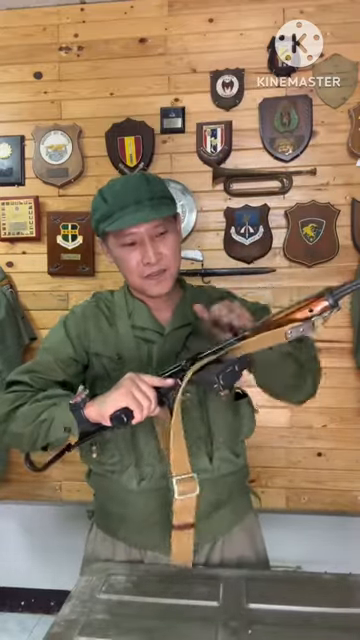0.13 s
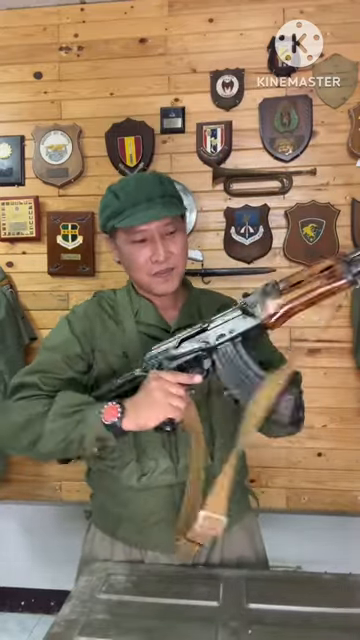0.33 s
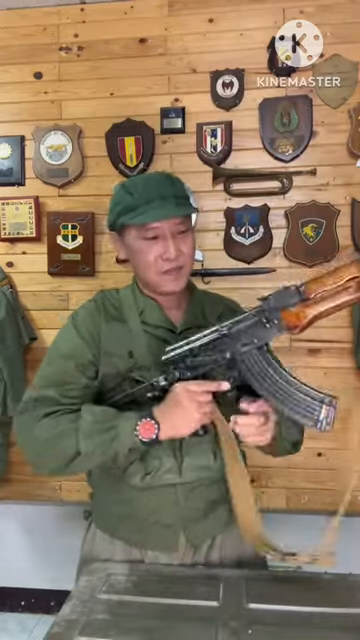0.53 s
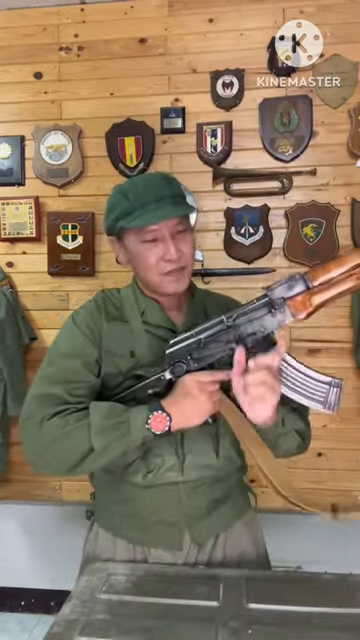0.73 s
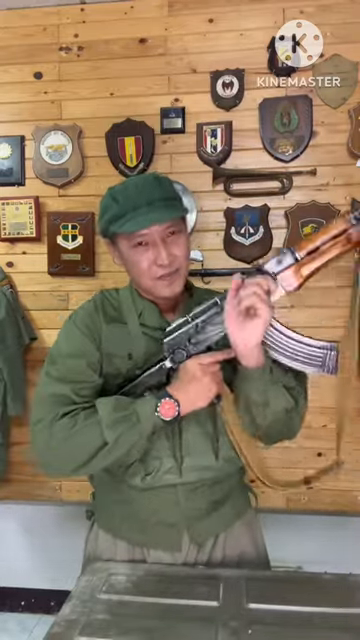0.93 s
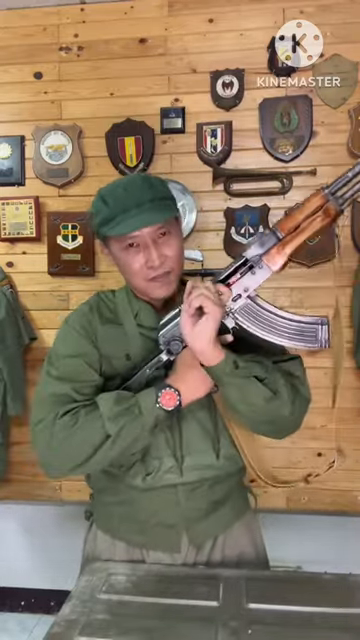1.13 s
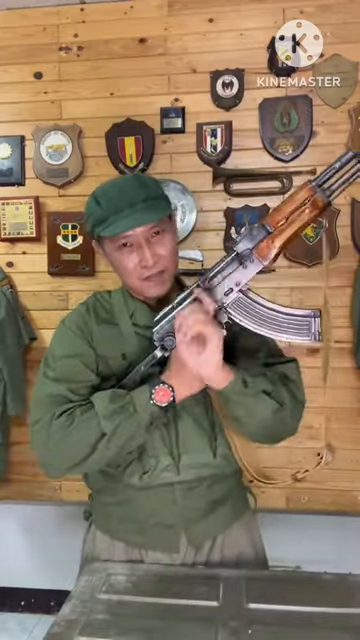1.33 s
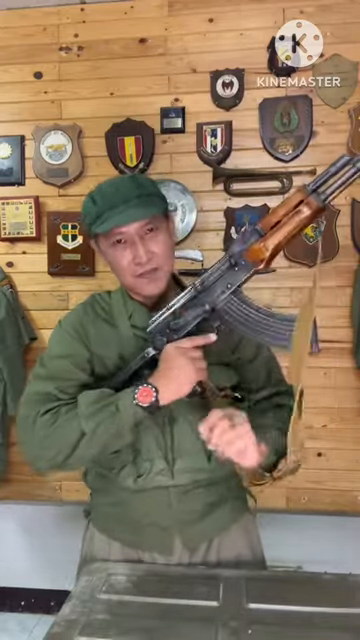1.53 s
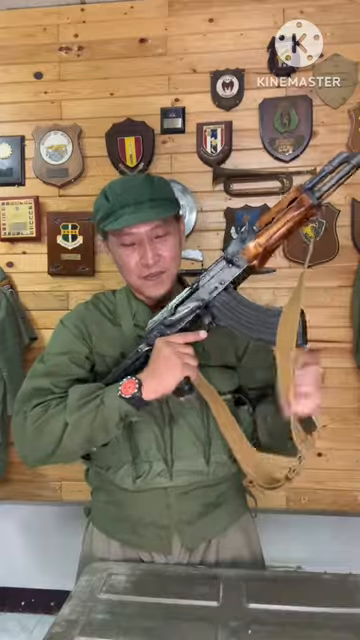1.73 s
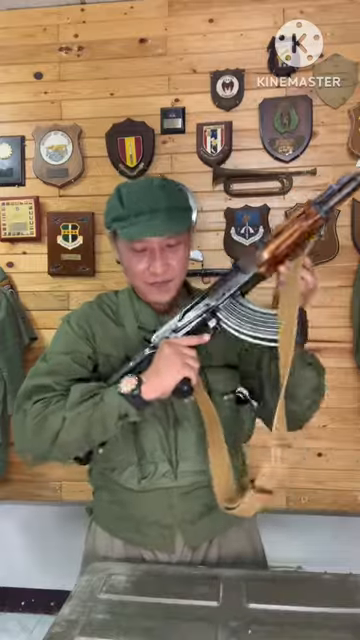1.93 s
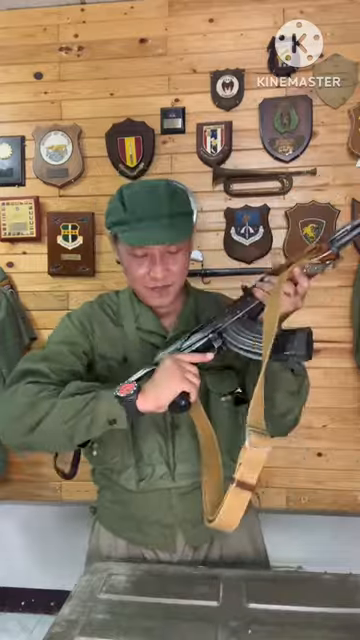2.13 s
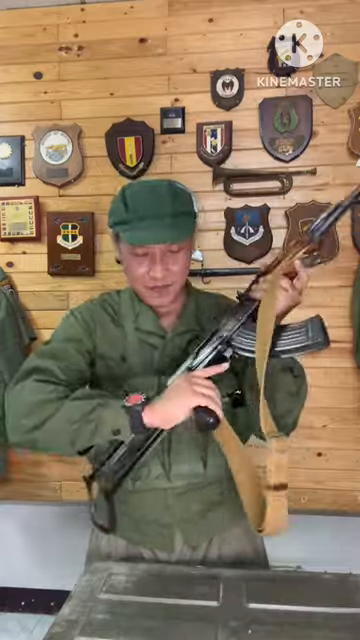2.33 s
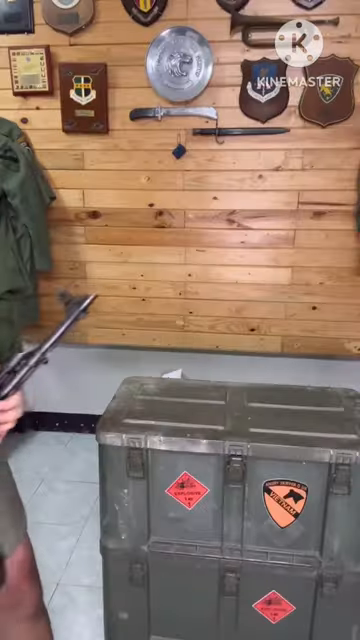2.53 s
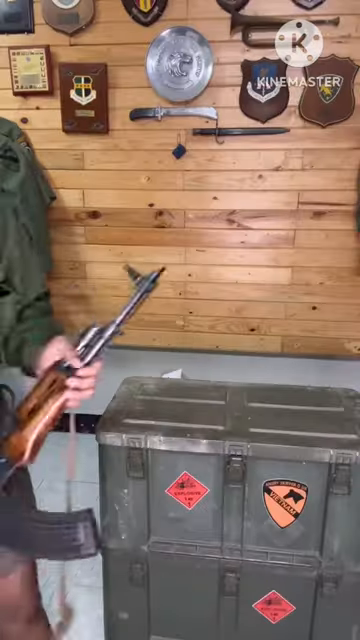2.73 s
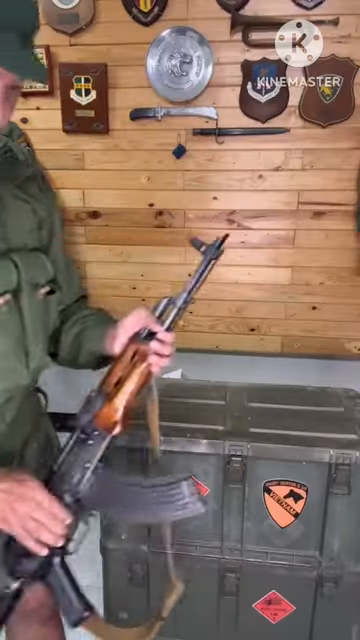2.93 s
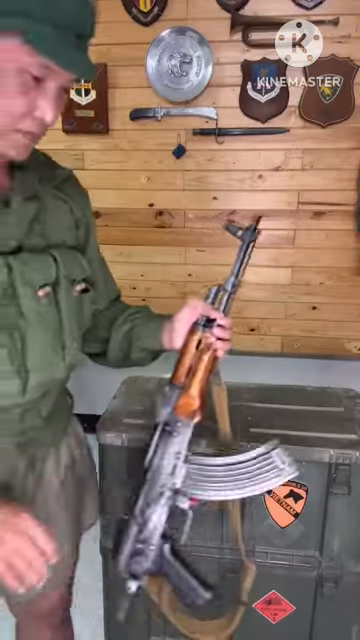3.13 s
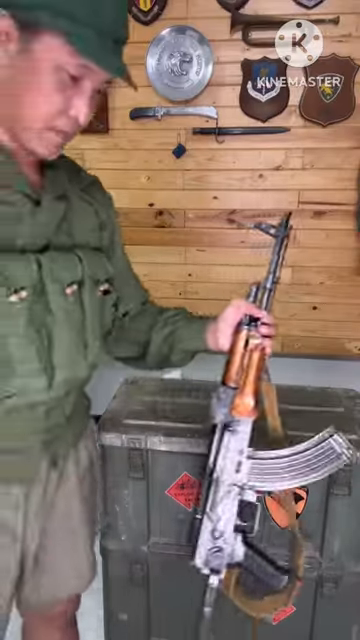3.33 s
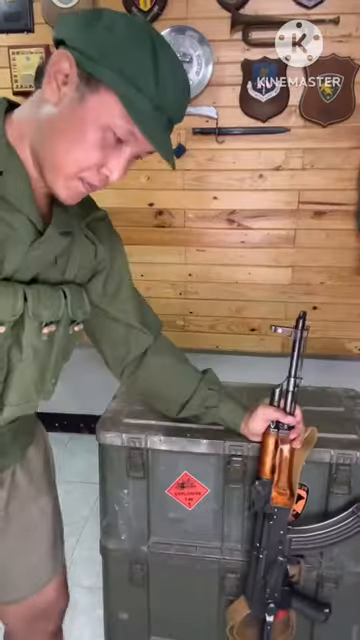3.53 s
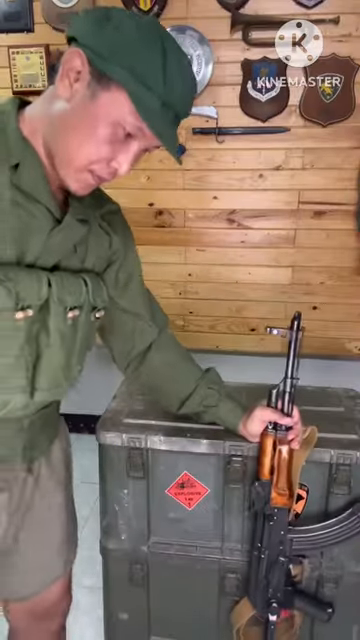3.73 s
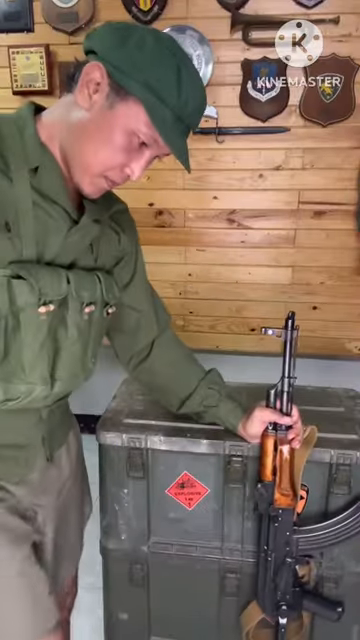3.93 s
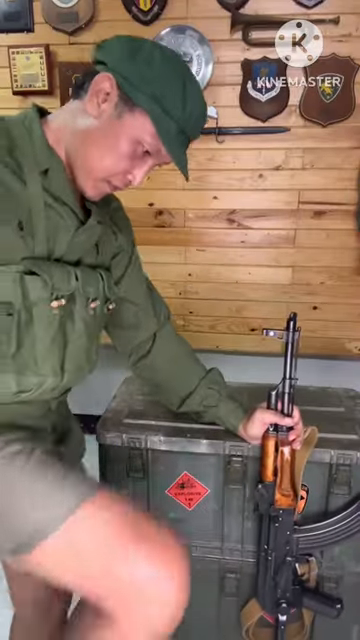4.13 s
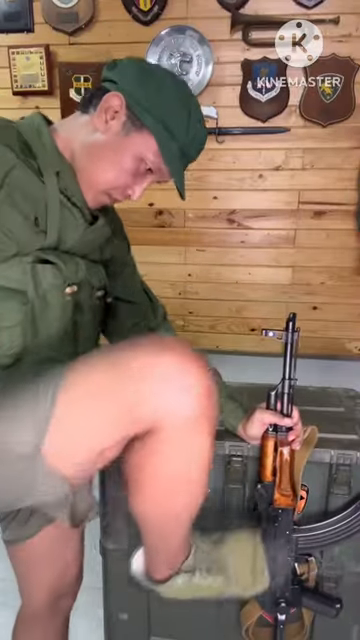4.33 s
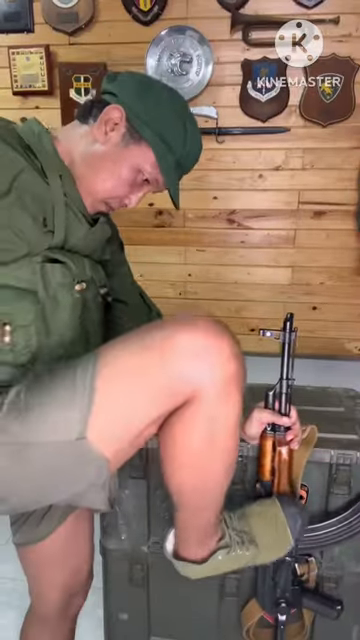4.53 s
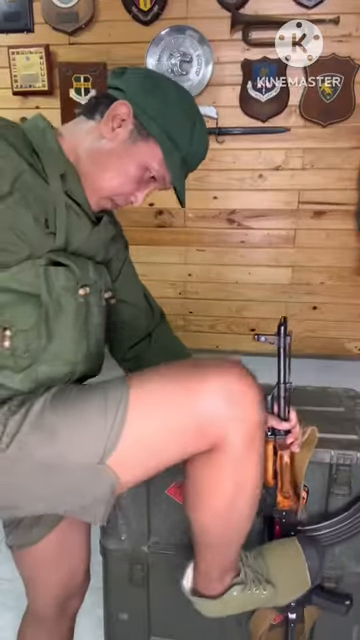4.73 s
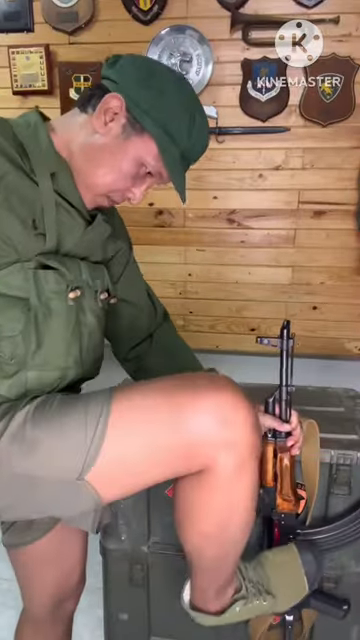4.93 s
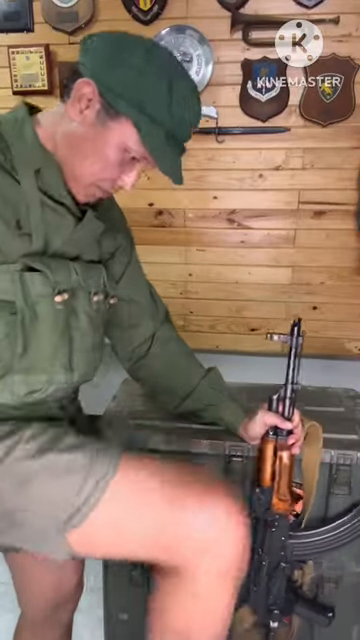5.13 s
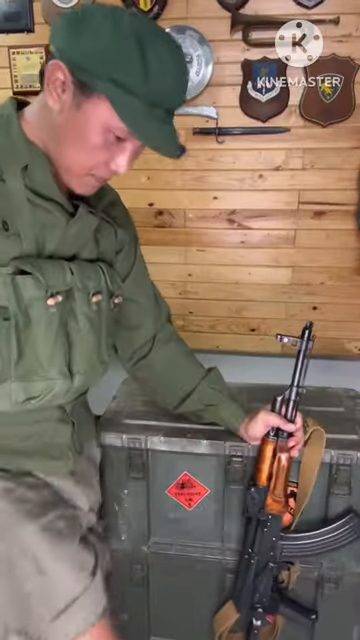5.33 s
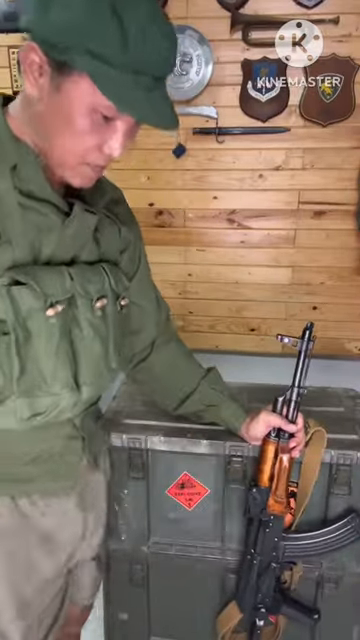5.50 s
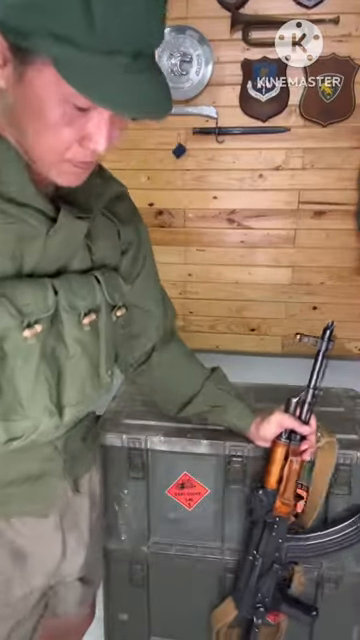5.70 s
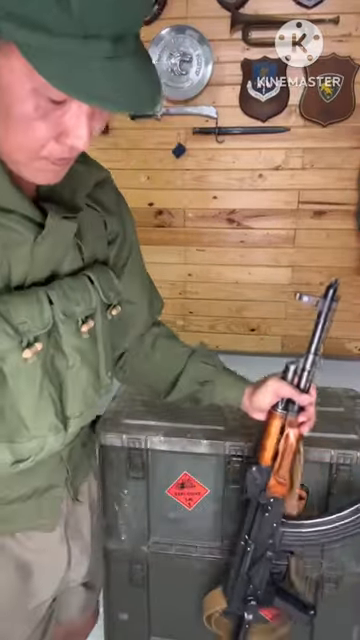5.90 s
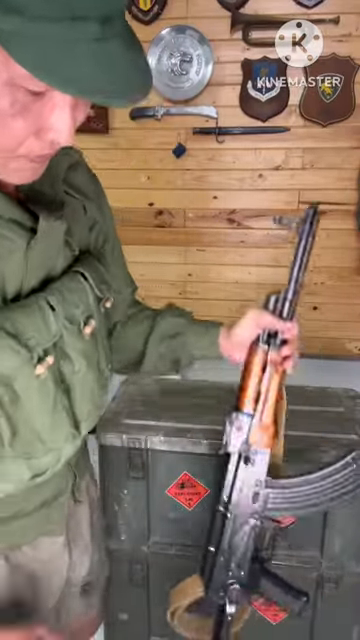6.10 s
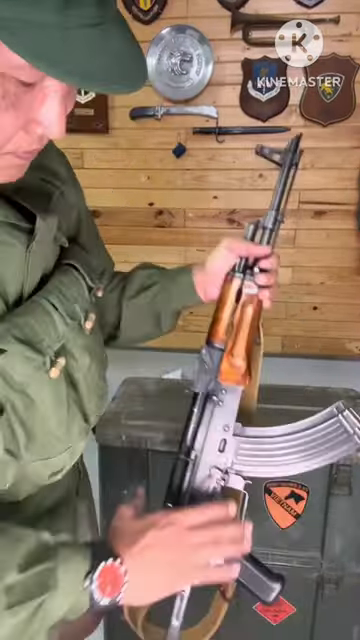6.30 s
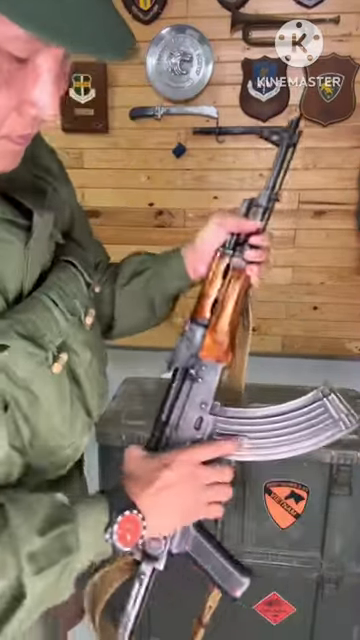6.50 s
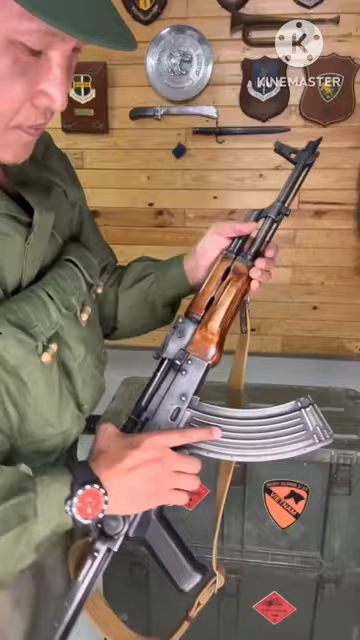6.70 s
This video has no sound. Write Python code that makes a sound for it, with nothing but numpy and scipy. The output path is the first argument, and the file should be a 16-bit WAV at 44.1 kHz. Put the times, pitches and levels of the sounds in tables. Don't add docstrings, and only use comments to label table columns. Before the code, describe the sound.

A hard steel slam bursts in at about 0.08 s as a rifle bolt runs home, loose parts chattering to 0.12 s over sleeve rustle. Soft knocks and buckle taps follow until 0.9 s. The bolt scrapes back to a heavy stop at 1.1 s, then snaps forward at 1.35 s with a bright double clack. Light sling rattle continues near 1.75-2.2 s. The sound fades out and in around 2.4 s and again near 3.4 s, with low air puffs between. A floor thump and airy buffet land at 3.55 s. From 4.57 to 4.8 s a boot drags the handle in gritty metal catches to a stop; the bolt slams at 5.03-5.09 s. Stock and boot thud at 5.53 and 5.64 s, a knock comes at 5.8 s, a strong low gust peaks near 6.1 s, and a small clack sounds at 6.57 s. Hum and short hard reflections surround everything, close to the phone.

```python
import sys
import numpy as np
from scipy import signal
from scipy.fft import rfft, irfft, next_fast_len
from scipy.io import wavfile
from scipy.ndimage import uniform_filter1d

SR = 44100
rng = np.random.default_rng(int(sys.argv[2]) if len(sys.argv) > 2 else 0)


def invert_db(level):
    return 10 ** (np.asarray(level, dtype=float) / 20)


def log_audio(samples):
    frames = np.atleast_2d(samples).T
    limited = np.clip(frames, -1, 1)
    pcm = np.round(limited * 32767).astype(np.int16)
    wavfile.write(sys.argv[1], SR, pcm)


N = 298116


def evened(x):
    return x / np.sqrt(np.mean(x ** 2) + 1e-20)


def read(points, hz):
    f, value = np.transpose(points)
    return np.interp(np.log(hz + 1), np.log(f + 1), value)


def add(mix, s, sound):
    part = mix[max(round(s * SR), 0):][:len(sound)]
    part += sound[:len(part)]


def colour(x, points):
    level = np.log(invert_db(read(points, np.fft.rfftfreq(2048, 1 / SR))))
    level = np.concatenate([level, level[-2:0:-1]])
    taps = np.fft.ifft(np.exp(signal.hilbert(level).conj())).real[:1024]
    return signal.oaconvolve(x, taps / np.linalg.norm(taps))[:len(x)]


def band(x, lo_hz, hi_hz):
    return signal.sosfilt(signal.butter(2, [lo_hz, hi_hz], "band", fs=SR, output="sos"), x)


# pitch_hz, level_db (per Hz)
RUMBLE_SPECTRUM = [(12, -50), (20, -24.5), (60, 2), (150, 0), (252, -11), (292, -27), (400, -9.5),
                   (520, -54), (880, -120)]
# pitch_hz, level_db (per Hz)
HUM_SPECTRUM = [(100, -4.5), (250, -0.5), (600, 4.5), (1200, -2), (2000, 0), (2700, -7.5), (4000, -18.5),
                (7000, -32.5), (16000, -47)]
# pitch_hz, level_db (per Hz)
CLOTH_SPECTRUM = [(1500, -2), (3000, -1.5), (4500, -3.5), (7000, -1.5), (10000, -10.5), (13500, -19),
                  (16000, -5.5)]
# time_s, rumble_db
STIR = [(0, -49), (.2, -48.5), (.7, -60), (1.3, -45), (1.68, -59), (2.0, -45.5), (2.15, -59), (2.55, -45.5),
        (2.72, -45.5), (3.05, -42), (3.52, -54), (3.58, -34), (3.8, -52), (4.6, -47.5), (5.0, -43.5),
        (5.3, -48), (6.1, -42), (6.4, -56.5)]
SLAM_TIMES = [
    .083,
    1.349,
    5.03,
]
# middle_s, width_s, level_db
SWISHES = [
    (.02, 0.1, -44),
    (.3, 0.11, -45.5),
    (0.941, 0.36, -64.5),
    (1.44, 0.091, -52),
    (2.199, 0.078, -65.5),
    (2.841, .07, -63.5),
    (4.33, 0.11, -72),
    (4.74, 0.084, -52.5),
    (5.19, 0.063, -50),
    (5.65, 0.055, -57),
]


def air():
    t = np.arange(N) / SR
    stir_db = np.interp(t, *np.transpose(STIR))
    since = np.maximum(t - np.array(SLAM_TIMES)[:, None], 0) / 0.057
    duck_db = -7.5 * (since * np.exp(1 - since)).sum(0)
    hum = invert_db(-48 + 0.043 * (stir_db + 46) + duck_db)
    rustle = invert_db(-60)
    for s, width, db in SWISHES:
        rustle = rustle + invert_db(db) * np.exp(-((t - s) / width) ** 2)

    rumble_gain = invert_db(read(RUMBLE_SPECTRUM, np.fft.rfftfreq(N, 1 / SR)))
    rumble = irfft(rfft(rng.standard_normal((2, N))) * rumble_gain, N)
    lumps = evened(uniform_filter1d(uniform_filter1d(rng.standard_normal(N), 1500), 1500))
    out = evened(rumble) * invert_db(stir_db + 2.2 * lumps)

    frames, hz = N // 128 + 6, np.fft.rfftfreq(512, 1 / SR)
    layers = (HUM_SPECTRUM, hum, 2.0, 0.8), (CLOTH_SPECTRUM, rustle, 1.5, 1.8)
    for spectrum, level, patchy_db, flicker_db in layers:
        a, b, c, d, patches = rng.standard_normal((frames, 257, 5)).T
        patches = evened(uniform_filter1d(uniform_filter1d(patches, 6, 0), 20, 1))
        flicker = evened(uniform_filter1d(rng.standard_normal(frames), 5))
        level_db = read(spectrum, hz)[:, None] + patchy_db * patches + flicker_db * flicker
        z = np.array([a + 1j * b, c + 1j * d]) * invert_db(level_db)
        noise = signal.istft(z, nperseg=512, noverlap=384)[1][:, :N]
        out = out + evened(noise) * level
    return out


def buffet(turn):
    return np.sin(turn) + 0.21 * np.sin(2.3 * turn) + 0.11 * np.sin(3.0 * turn)


# start_s, level_db, pitch_hz
PUFFS = [(0.164, -37, 118), (0.344, -44, 64.3), (0.899, -38, 168), (1.136, -44, 103), (1.398, -39, 73.1),
         (1.461, -35.5, 64), (2.287, -52, 65.4), (2.611, -34, 80), (2.814, -34, 76.5), (2.903, -38, 108.6),
         (3.004, -30, 64), (3.193, -38.5, 52.2), (3.543, -39, 162), (3.552, -22.5, 143.3), (3.721, -41, 72),
         (4.211, -45, 51), (4.559, -39.5, 100), (4.817, -38.5, 131.4), (5.014, -28, 103), (5.544, -32, 158)]
# start_s, level_db, pitch_hz, length_cycles
GUST = [(5.714, -22, 69, 1.1), (5.752, -32, 77.7, 6.1), (5.784, -24, 116.4, 1.5), (5.93, -27.5, 61.1, 1.3),
        (5.983, -24.5, 78.6, 1.5), (6.022, -16.5, 106.3, 2.8), (6.059, -20, 115, 3.7),
        (6.066, -30.5, 200, 3.6), (6.082, -10.5, 108.3, 0.75), (6.088, -26.5, 210, 2.2),
        (6.113, -22, 56.5, 1.5), (6.174, -28, 59.7, 1.1), (6.245, -28, 61.9, 1.9), (6.472, -42, 99.4, 1.3)]


def puffs():
    out = np.zeros((2, N))
    rows = GUST + [(*row, 2.5) for row in PUFFS]
    phases = rng.random((len(rows), 2)) * 2 * np.pi
    for (s, db, hz, cycles), phase in zip(rows, phases):
        u = np.arange(0, 3 * max(cycles, 1), hz / SR)
        shape = u / cycles * np.exp(1 - u / cycles * 2.25) * 3.18
        turn = 2 * np.pi * u * (1 - 0.0031 * u)
        for port in (0, 1):
            add(out[port], s, invert_db(db - 3.5) * shape * buffet(turn + phase[port]))
    return out


# pitch_hz, t60_s
WALL_DECAY = [(200, 1), (700, 0.46), (1400, 0.34), (2000, 0.51), (4000, 0.42), (8000, 0.48), (14000, 0.34)]
# pitch_hz, level_db
WALL_COLOUR = [(300, -5), (1000, -2.5), (1700, 0.5), (2350, 3), (3100, 0.5), (4500, 2.5), (8000, -7.5),
               (15000, 1.5)]
# delay_s, first_draw_db, second_draw_db
ECHOES = [
    (.006, -7, -11.5),
    (0.017, -6, -11),
    (.021, -6, 7.5),
    (0.0239, -13, 3),
    (0.033, -2, 3),
    (0.043, 0, -1),
]


def room(x, swell_s=0.012, early=0.32, echo_db=-15.0):
    taps = np.zeros((2, SR))
    slots = np.arange(0, SR - 8, 8)
    at = slots + rng.integers(0, 8, (2, len(slots)))
    np.put_along_axis(taps, at, rng.choice([-1., 1.], at.shape), 1)
    hz, t, z = signal.stft(taps, SR, nperseg=256)
    level_db = read(WALL_COLOUR, hz)[:, None] - 60 * t / read(WALL_DECAY, hz)[:, None]
    tail = signal.istft(z * invert_db(level_db), SR, nperseg=256)[1]
    t = np.arange(tail.shape[1]) / SR
    tail = tail * (early + 1 - np.exp(-(t / swell_s) ** 3))
    tail = tail / np.linalg.norm(tail[0])
    for s, *db in ECHOES:
        tail[:, round(s * SR)] += invert_db(np.add(db, echo_db))
    return signal.fftconvolve(x[None], tail, axes=1)[:, :N]


# start_s, pitch_hz, level_db, t60_s
RINGS = [(.062, 6100, -27, .05), (2.158, 5744, -37, .2), (2.158, 6150, -45, .06), (2.04, 440, -41, .7),
         (3.55, 118, -28, .3), (3.66, 64, -36, 1.2), (4.786, 10450, -37, .09), (4.79, 10380, -47, .3),
         (5.0265, 13100, -16, .045), (5.0265, 10600, -21, .04), (5.043, 10900, -19, .04),
         (5.06, 520, -37, .2), (5.02, 310, -38, .25), (5.645, 290, -27, .12), (1.09, 5300, -33, .08),
         (5.41, 11400, -64, .5)]


def rings():
    t, out = np.arange(SR) / SR, np.zeros(N)
    for s, hz, db, t60 in RINGS:
        pair = np.sin(2 * np.pi * hz * t) + 0.66 * np.sin(2 * np.pi * 1.006 * hz * t)
        onset = 1 - np.exp(-t / (0.041 * t60))
        add(out, s, invert_db(db - 60 * t / t60) * pair * onset)
    return out


# start_s, level_db, pitch_hz, t60_s
KNOCKS = [(0.574, -41, 693, 0.079), (0.668, -53.5, 457, 0.2), (0.792, -46, 645, 0.53),
          (1.74, -49, 616, 0.21), (1.765, -45.5, 456, 0.26), (3.54, -35.5, 447, 0.069),
          (3.559, -39, 418, 0.12), (4.58, -34, 327, 0.076), (4.817, -34, 285, 0.091),
          (5.531, -17, 524, 0.031), (5.642, -44, 566, 0.05), (5.645, -27, 301, 0.11),
          (5.658, -33, 323, 0.037)]


def knocks():
    t, out = np.arange(SR // 3) / SR, np.zeros(N)
    noises = rng.standard_normal((len(KNOCKS), SR // 3))
    for (s, db, hz, t60), noise in zip(KNOCKS, noises):
        modes = np.sin(2 * np.pi * hz * t) + 0.5 * np.sin(2 * np.pi * 1.13 * hz * t)
        thud = 0.86 * modes + 1.13 * evened(band(noise, 180, 680))
        onset = 1 - np.exp(-t / 0.00044)
        add(out, s, invert_db(db - 60 * t / t60) * onset * thud)
    return out


# pitch_hz, width_hz, level_db
RECEIVER_MODES = [(2040, 250, 6.5), (2180, 130, 2.5), (2260, 46, -22), (2503, 55, -0.5), (2880, 20, -26),
                  (4000, 350, -6), (4480, 60, -8), (5620, 70, -0.5), (6260, 440, 8), (10800, 190, 1),
                  (11430, 220, -6)]
# pitch_hz, level_db (per Hz)
STEEL_SPECTRUM = [(300, -25.5), (800, -4.5), (1500, 2), (2200, -1.5), (3200, 2.5), (6000, -2.5), (8000, 3),
                  (11000, -23.5), (14500, -20), (16000, -28.5), (16600, -60)]


def steel(drive, sheen, ring_db):
    t = np.arange(3000) / SR
    modes = np.zeros(len(t))
    for hz, width, db in RECEIVER_MODES:
        decay = np.exp(-np.pi * width * t)
        modes += invert_db(db) * np.sqrt(width) * decay * np.sin(2 * np.pi * hz * t)
    ringing = signal.oaconvolve(drive, modes / np.linalg.norm(modes))[:N]
    low_pass = signal.butter(4, 8000, fs=SR, output="sos")
    high_pass = signal.butter(4, 8000, "high", fs=SR, output="sos")
    clatter = signal.sosfilt(low_pass, colour(drive, STEEL_SPECTRUM))
    treble = signal.sosfilt(high_pass, colour(sheen, STEEL_SPECTRUM))
    return clatter + invert_db(ring_db) * ringing + treble


# start_s, rise_s, fall_s, scrape_db, sheen_db (relative)
STROKES = [
    (0.049, 0.022, 0.0093, -29, -0.5),
    (1.06, 0.05, 0.012, -28.5, -6),
    (1.031, 0.027, .01, -43, -13),
    (1.32, .031, .006, -26, 6),
    (1.989, 0.0048, 0.076, -57, 3.5),
    (4.556, 0.023, 0.008, -37, 1.5),
    (4.569, 0.13, .05, -36.5, -15),
    (4.996, 0.035, .003, -32.5, -5),
]


def strokes():
    grip_db = 1.8 * np.minimum(rng.exponential(size=N // 40 + 1), 4)
    slips = evened(rng.standard_normal(N) * invert_db(grip_db).repeat(40)[:N])
    drive, sheen = np.zeros(N), np.zeros(N)
    for s, rise, fall, db, sheen_db in STROKES:
        t = np.arange(0, rise + fall, 1 / SR)
        slack = np.interp(t, [0, rise, rise + fall], [1, 0, 1])
        level = invert_db(db - 26.5 * slack ** 1.7)
        add(drive, s, level)
        add(sheen, s, level * invert_db(sheen_db + 22.0))
    return steel(drive * slips, sheen * slips, ring_db=-1.5)


# start_s, blow_db, body_hz, edge_db (relative), room_send_db
CLACKS = [(0.8365, -48, 1530, -7, 8), (0.8925, -36, 2113, 4, -8), (1.7416, -55.5, 1835, -4, 5.5),
          (1.9894, -27.5, 1770, -9.5, -6), (2.1574, -48, 2220, 5, -16), (2.6722, -36.5, 2060, -9, -2.5),
          (2.8923, -53.5, 1820, -4, 9), (4.5744, -27.5, 2054, -8.5, 2), (4.786, -31, 1690, 2.5, -8),
          (5.8924, -42, 2140, 1.5, -5.5), (6.5715, -19, 1787, -16.5, -8)]
BUMPS = [
    (2.833, -22, 1860, -15, -5.5),
    (4.816, -20.5, 1100, -20.5, -3),
    (5.465, -45, 2200, 0.5, -6),
    (5.529, -10, 1910, -25, -6.5),
    (5.641, -19, 1000, -14.5, -8),
    (5.6645, -37, 5800, -15.5, -13),
    (5.537, -21, 3040, -17.5, -7.5),
    (5.7918, -15.5, 1450, -9.5, -6.5),
    (6.4378, -49, 1750, 6.5, -16),
    (6.59, -32.5, 2580, -11.5, -2),
]
CATCHES = [(4.567, -34.5, 1473, -4, -5.5), (4.599, -31, 2200, -13, 3.5), (4.614, -33, 2230, -3.5, -10.5),
           (4.635, -27.5, 2110, -15, -16), (4.648, -30, 2480, -12.5, -5.5), (4.662, -27.5, 2530, -9, -7),
           (4.672, -32.5, 2200, -13.5, -6.5), (4.695, -22, 2520, -18.5, -4), (4.704, -26, 2116, -14, -5.5),
           (4.714, -27, 2500, -14, -5), (4.731, -33.5, 2300, -18, -8)]
BOLT = [(0.0642, -29.5, 3600, 1.5, -8.5), (0.0763, -21.5, 2100, 2.5, -5), (.0828, -8.5, 2210, -0.5, -4.5),
        (.0855, -19.5, 3870, -2.5, -9.5), (0.0965, -14.5, 2180, -12.5, -7),
        (0.1025, -17.5, 2050, -11.5, -7.5), (.106, -28, 2100, -13.5, -10), (.1105, -10, 2170, -14, -17.5),
        (.1165, -18, 2100, -9, -11.5), (1.0665, -26, 1490, -8, -6), (1.072, -25.5, 1480, -0.5, 2.5),
        (1.077, -26.5, 4160, -9.5, -8.5), (1.086, -17.5, 1340, -12, -7), (1.091, -25, 2130, -6, -9.5),
        (1.0995, -28, 1355, -15, -10), (1.1088, -7.5, 1050, -17, -8.5), (1.1122, -11, 1964, -19.5, -10.5),
        (1.119, -20, 2146, -10.5, -13), (1.1315, -15.5, 2280, -19.5, -9.5), (1.138, -16.5, 2605, -20, -8),
        (1.333, -34, 1556, 0.5, -8), (1.345, -19.5, 2300, -12, -9), (1.3489, -9.5, 2130, -2, 0.5),
        (1.361, -16, 2250, -12.5, -15.5), (1.368, -17, 2200, -11, -13), (1.3737, -11.5, 2230, -9.5, -12),
        (1.3805, -7.5, 2450, -6.5, -9.5), (5.0099, -35, 2100, -7.5, -6), (5.0263, -19, 2300, 6, 2.5),
        (5.030, -18.5, 2060, 3, -5), (5.0375, -15.5, 2210, -5.5, -10.5), (5.043, -16, 4500, 2, -4.5),
        (5.049, -15, 2170, -20.5, -7.5), (5.057, -13.5, 2320, -16, -5.5), (5.061, -8.5, 2200, -13.5, -8),
        (5.0655, -7, 2310, -17, -13), (5.0695, -9.5, 2600, -15, -7), (5.078, -15.5, 2310, -13, -2.5),
        (5.087, -10.5, 2340, -14.5, -10)]


def clacks():
    bare_steel = -0.5, 19000, .0034
    light_parts = -2.5, 3900, .0042
    padded = -12.5, 4600, .0038
    kinds = (BOLT, bare_steel), (CLACKS, light_parts), (BUMPS, padded), (CATCHES, bare_steel)
    rows = [(*row, *kind) for table, kind in kinds for row in table]

    t = np.arange(1024) / SR
    direct, send = np.zeros((3, N)), np.zeros((3, N))
    chatter = rng.standard_normal((len(rows), 1024))
    for (s, db, hz, edge_db, send_db, sheen_db, edge_hz, chatter_s), noise in zip(rows, chatter):
        contact = (1 - np.exp(-t / .0003)) * np.exp(-t / chatter_s)
        spectrum = rfft(noise * contact)
        burst = irfft(spectrum / np.sqrt(abs(spectrum))) * np.sqrt(contact)
        burst = invert_db(db + 2.0) * burst / abs(burst).max()
        body = band(band(burst, 0.79 * hz, 1.23 * hz), 0.5 * hz, 1.94 * hz)
        body = invert_db(db - 4.0) * np.sqrt(hz / 2200) * body / abs(body).max()
        edge = invert_db(edge_db + 4.5) * band(burst, 600, edge_hz)
        sheen = invert_db(edge_db + sheen_db + 26.0) * burst
        for bus, gain in ((direct, 0.93), (send, invert_db(np.clip(send_db, -14, 7)))):
            add(bus[0], s, gain * body)
            add(bus[1], s, gain * edge)
            add(bus[2], s, gain * sheen)
    return [body + steel(edge, sheen, ring_db=-3.0) for body, edge, sheen in (direct, send)]


# pitch_hz, lead_radians
PORT_LEAD = [(60, 0), (4200, 0), (5000, -.9), (6200, -1.6), (7000, -3.14), (8500, -3.14), (9300, -4.7),
             (10300, -5.7), (10700, -6.28), (12900, -6.28), (13800, -8.0), (14600, -9.42)]
# pitch_hz, likeness (0 to 1)
PORT_LIKENESS = [(60, .8), (250, .8), (600, .93), (1200, .6), (2100, .92), (2800, .55), (3800, .85),
                 (4600, .55), (6500, .8), (7000, 1.0), (8500, 1.0), (9300, .75), (10900, 1.0), (12800, 1.0),
                 (13500, .65), (14500, 1.0)]
# pitch_hz, level_db
PORT_TILT = [(60, 0.0), (110, 0.0), (200, 0.0), (380, -1.5), (700, -1.5), (1290, -1.0), (2380, -0.5),
             (4400, 0.5), (8120, 0.0), (15000, 0.0)]
# pitch_hz, level_db
TREBLE_DIPS = [(6200, 0), (7000, -10), (8600, -10), (9400, 0), (14300, 0), (14900, -2)]


def scene():
    direct, send = clacks()
    scrape, dull, ring = strokes(), knocks(), rings()
    near = direct + scrape + dull + ring
    to_room = send + invert_db(-9.0) * scrape + invert_db(-4.5) * dull + invert_db(-11.0) * ring
    far = invert_db(3.0) * room(to_room) + air() + puffs()

    size = next_fast_len(N + 512)
    hz = np.fft.rfftfreq(size, 1 / SR)
    near, (a, b) = rfft(near, size), rfft(far, size)
    alike = read(PORT_LIKENESS, hz)
    shared = np.sqrt((1 + alike) / 2) * a
    apart = np.sqrt((1 - alike) / 2) * b
    port = np.exp(.5j * read(PORT_LEAD, hz)) * invert_db(read(PORT_TILT, hz) / 2)
    aside = np.exp(.000009j * hz)
    left = (near * aside + shared + apart) * port
    right = (near / aside + shared - apart) / port
    return irfft(np.array([left, right]) * invert_db(read(TREBLE_DIPS, hz)), size)[:, :N]


def top_cut(x):
    return signal.sosfilt(signal.butter(12, 16490, fs=SR, output="sos"), x)


SCENE_CHANGES = [
    2.409,
    3.385,
]


def record(dry):
    power_db = 10 * np.log10(abs(uniform_filter1d((dry ** 2).mean(0), 600)) + 1e-12)
    fall = np.arange(N) * 53.0 / SR
    held_db = np.maximum.accumulate(power_db + fall) - fall
    over_db = np.maximum(held_db + 25.0, 0)
    ducked = dry / invert_db(0.2 * uniform_filter1d(over_db, 300))

    fade_out_s, cut_gain = .107, .14
    gap_s, fade_in_s, fade_in_bend = .036, .15, 1.7
    to_cut = np.arange(N) / SR - np.array(SCENE_CHANGES)[:, None]
    fade_out = cut_gain - (1 - cut_gain) * to_cut / fade_out_s
    fade_in = np.clip((to_cut - gap_s) / fade_in_s, 0, 1) ** fade_in_bend
    fade = np.where(to_cut < 0, fade_out, fade_in)
    faded = ducked * np.clip(fade, 0, 1).prod(0)

    ceiling = .98
    return top_cut(ceiling * np.tanh(faded / ceiling))


dry = scene()
out = record(dry)
log_audio(out)
```